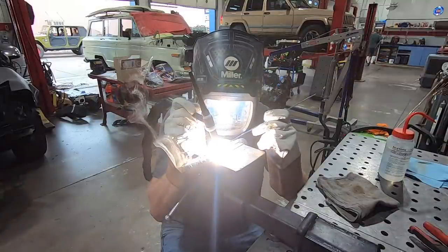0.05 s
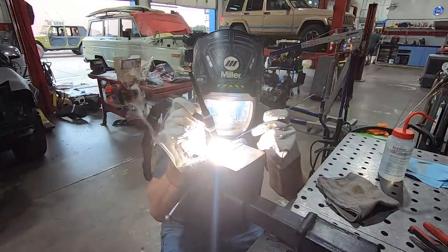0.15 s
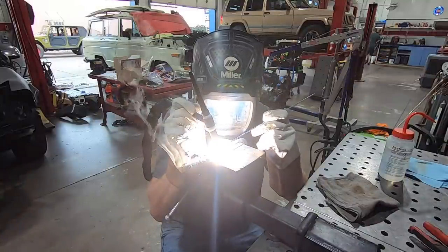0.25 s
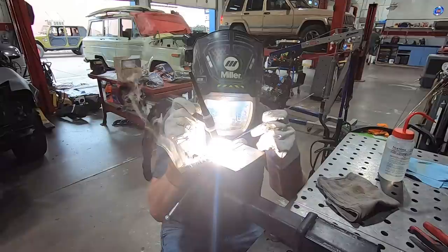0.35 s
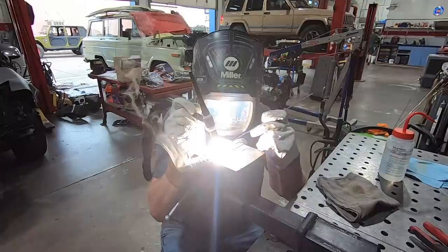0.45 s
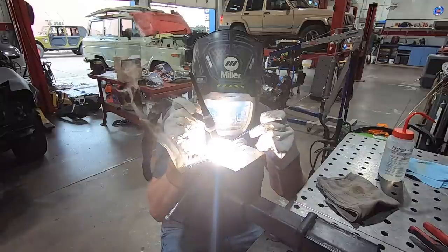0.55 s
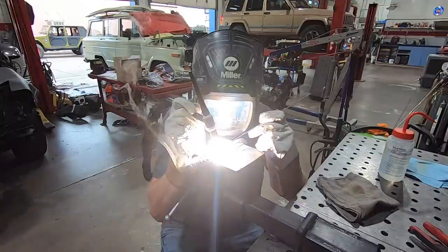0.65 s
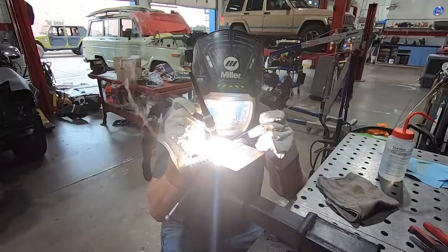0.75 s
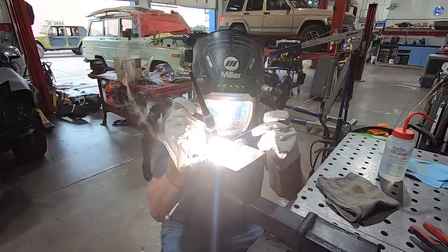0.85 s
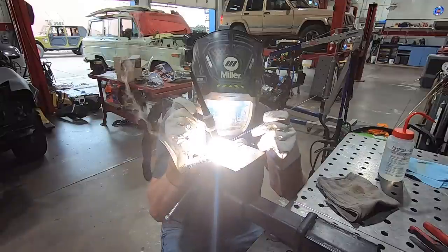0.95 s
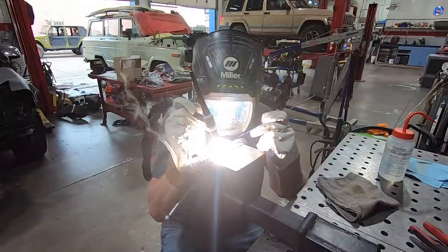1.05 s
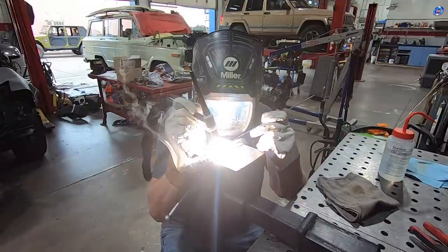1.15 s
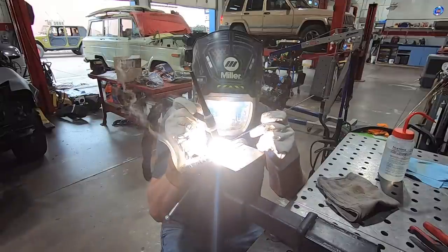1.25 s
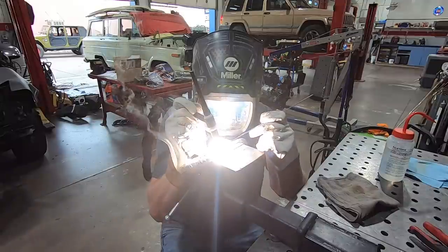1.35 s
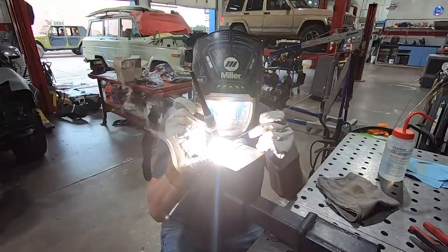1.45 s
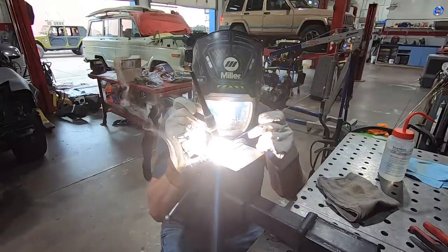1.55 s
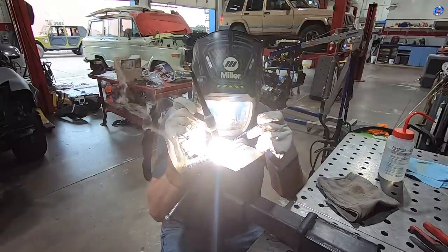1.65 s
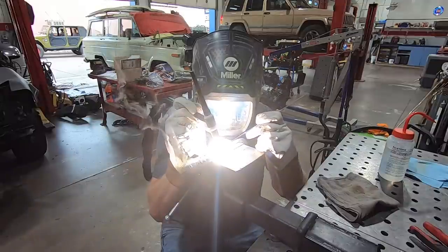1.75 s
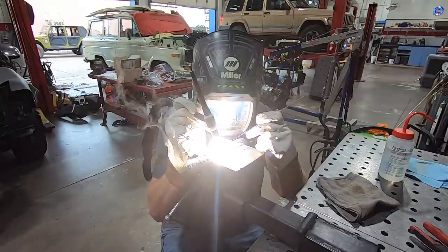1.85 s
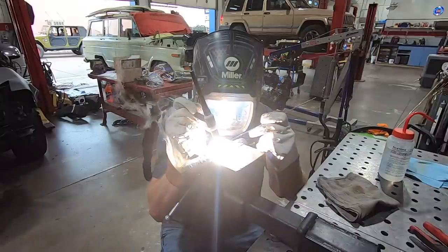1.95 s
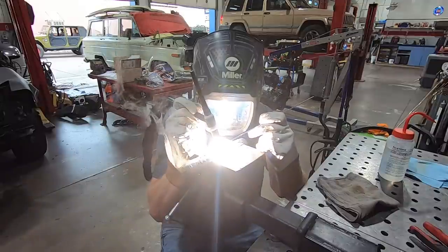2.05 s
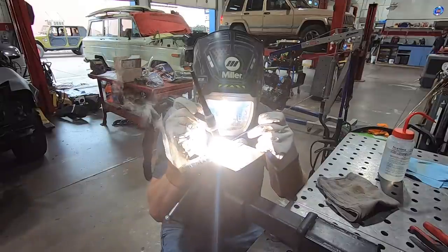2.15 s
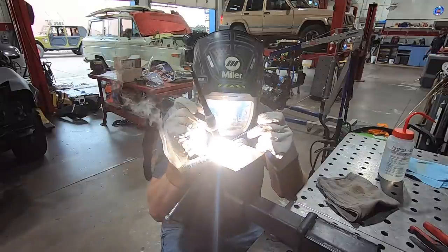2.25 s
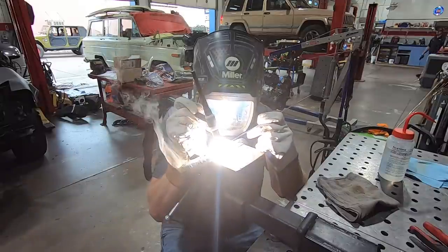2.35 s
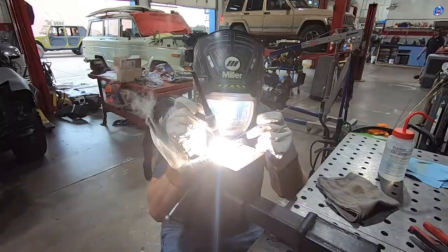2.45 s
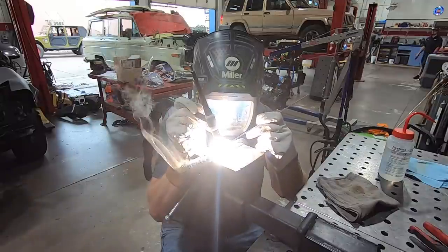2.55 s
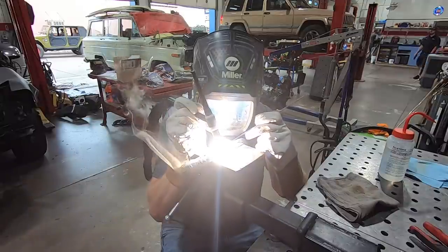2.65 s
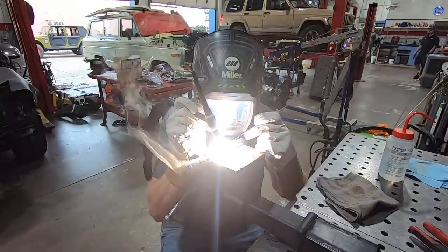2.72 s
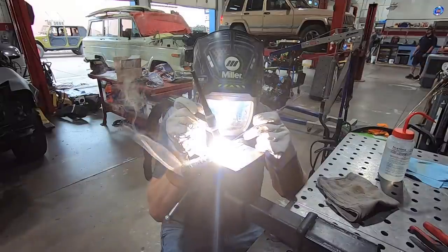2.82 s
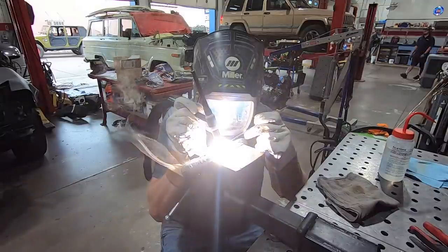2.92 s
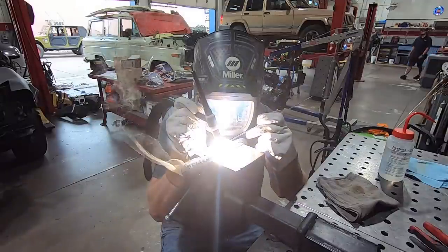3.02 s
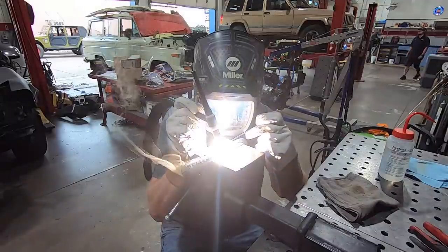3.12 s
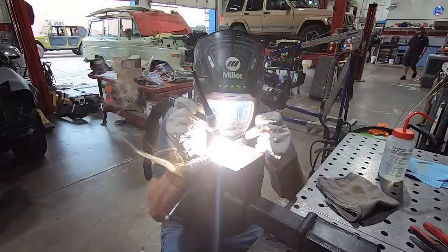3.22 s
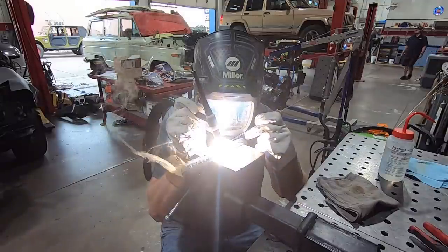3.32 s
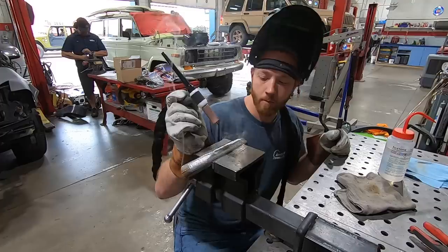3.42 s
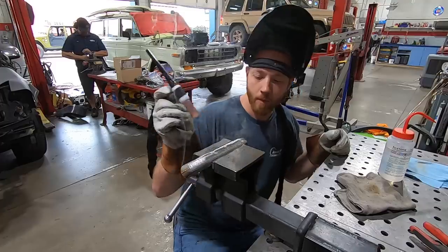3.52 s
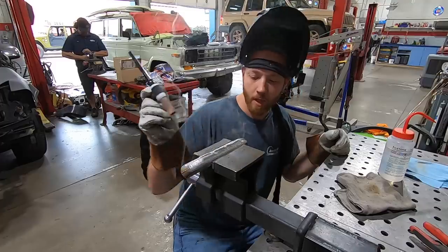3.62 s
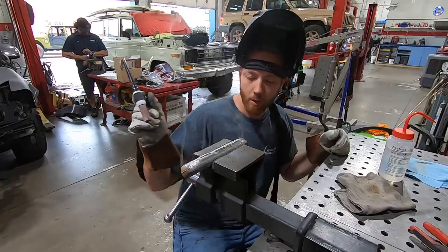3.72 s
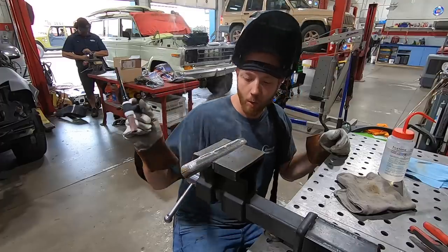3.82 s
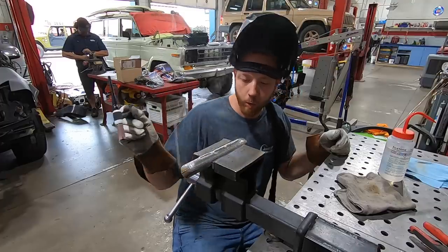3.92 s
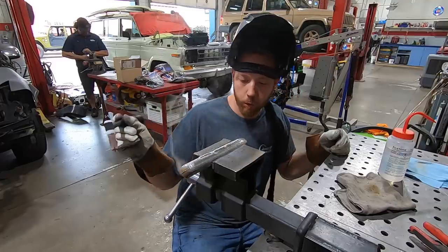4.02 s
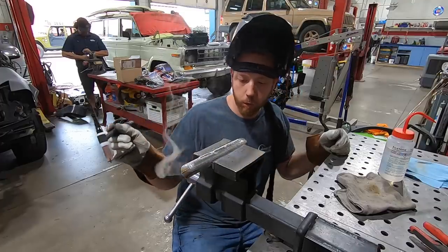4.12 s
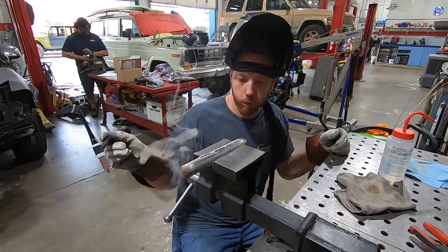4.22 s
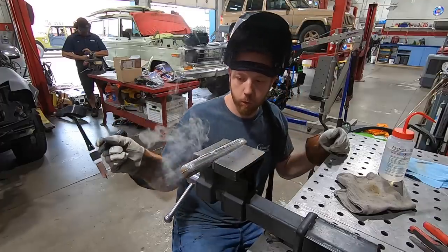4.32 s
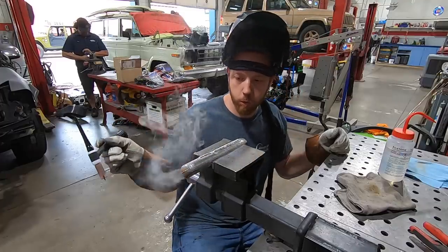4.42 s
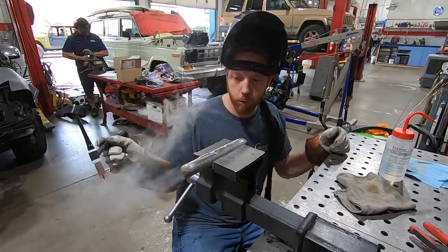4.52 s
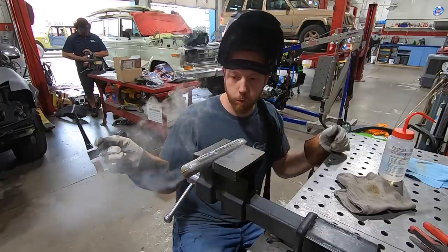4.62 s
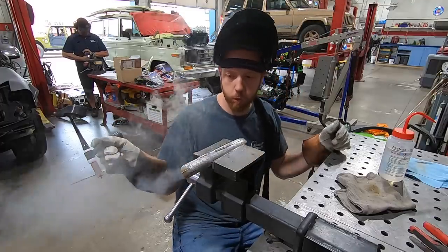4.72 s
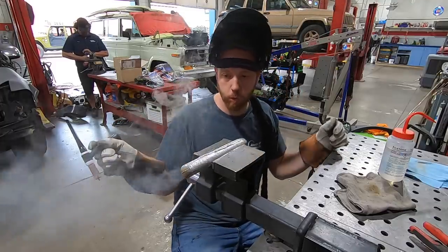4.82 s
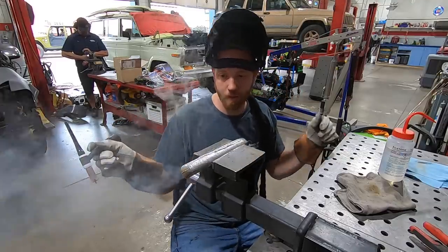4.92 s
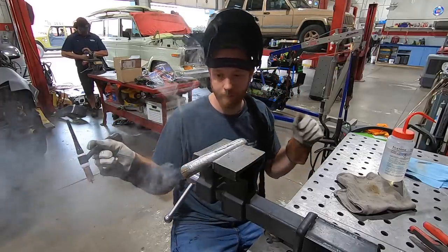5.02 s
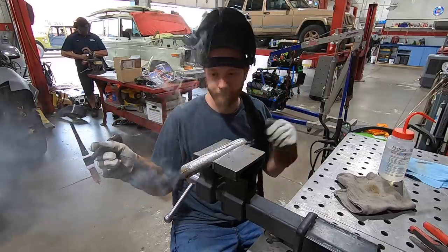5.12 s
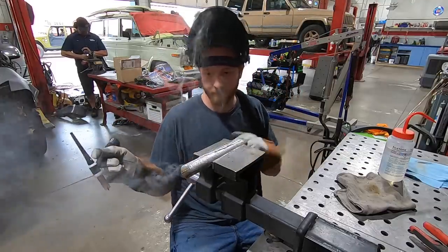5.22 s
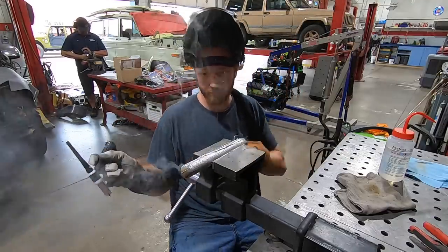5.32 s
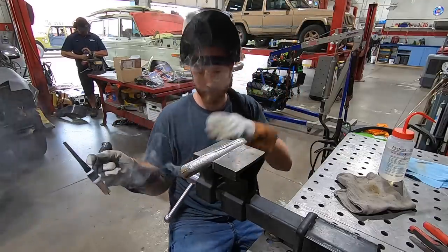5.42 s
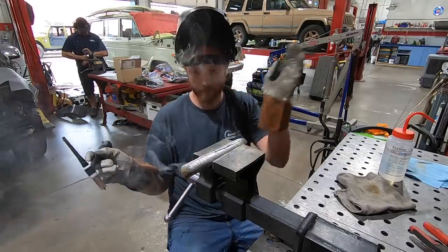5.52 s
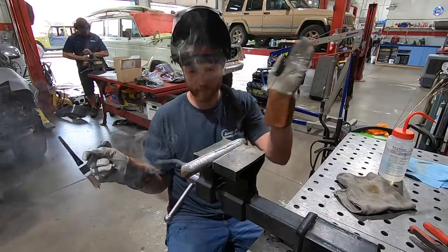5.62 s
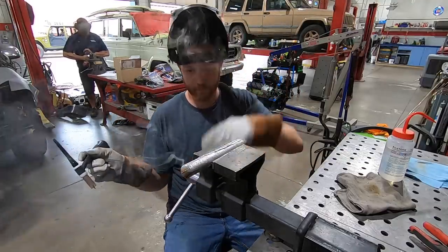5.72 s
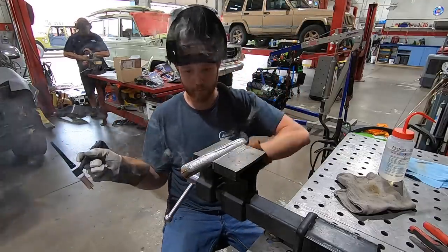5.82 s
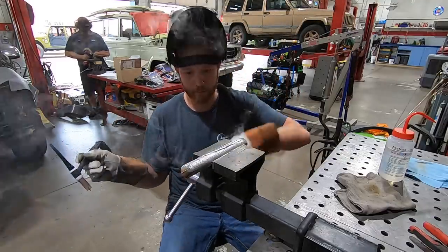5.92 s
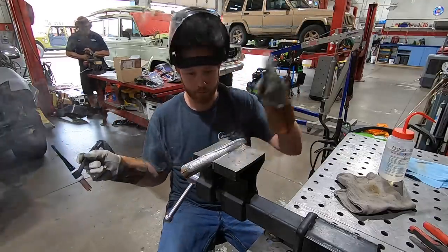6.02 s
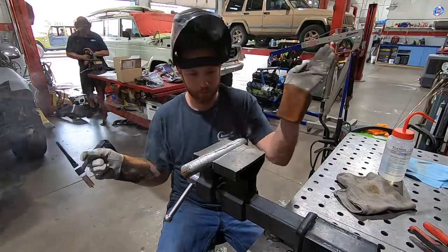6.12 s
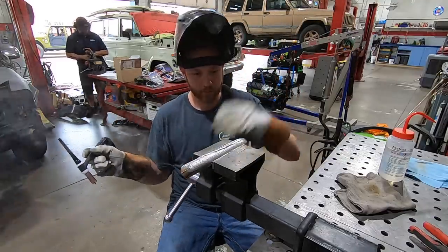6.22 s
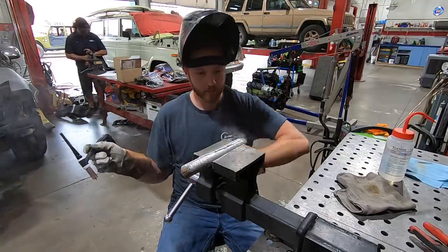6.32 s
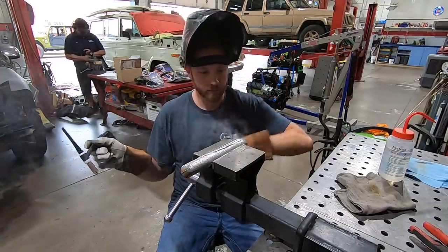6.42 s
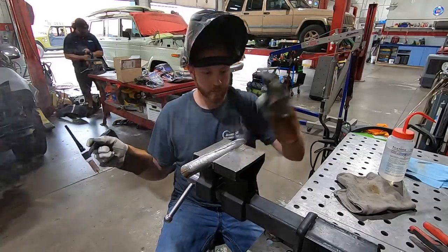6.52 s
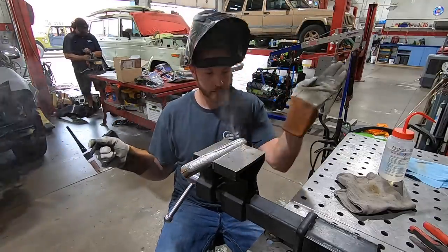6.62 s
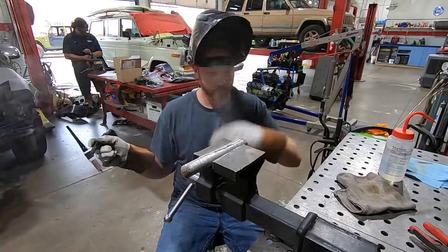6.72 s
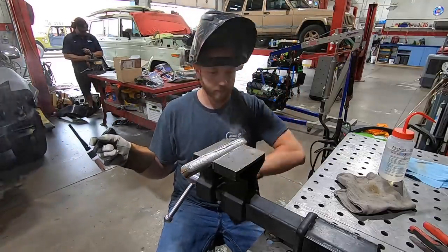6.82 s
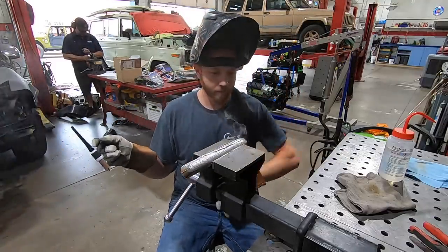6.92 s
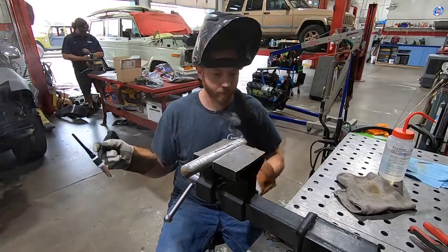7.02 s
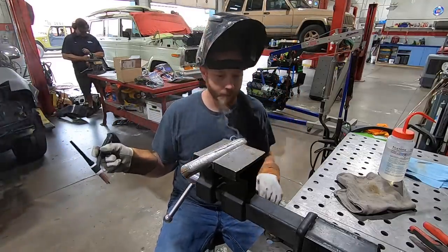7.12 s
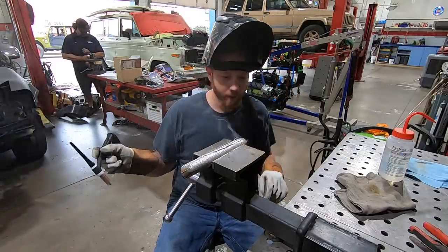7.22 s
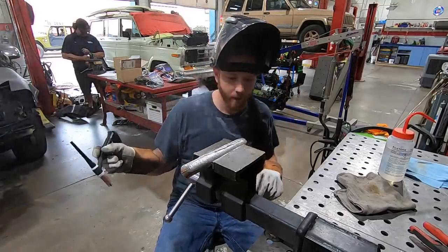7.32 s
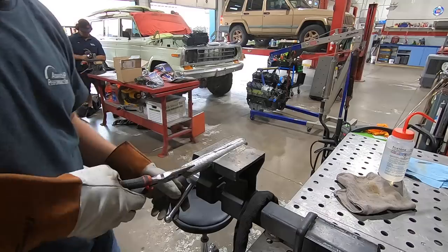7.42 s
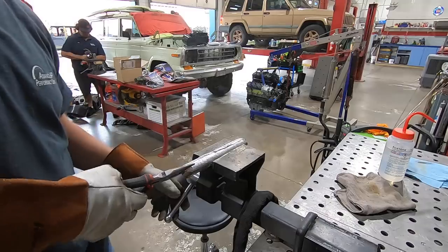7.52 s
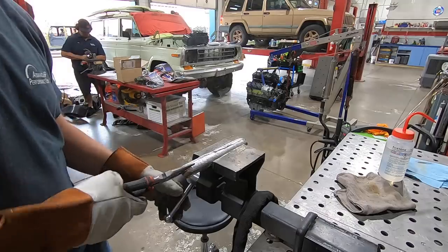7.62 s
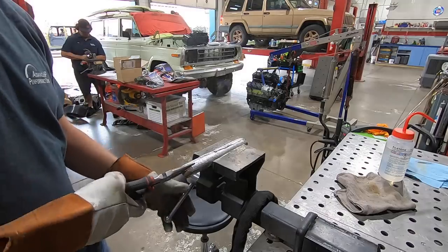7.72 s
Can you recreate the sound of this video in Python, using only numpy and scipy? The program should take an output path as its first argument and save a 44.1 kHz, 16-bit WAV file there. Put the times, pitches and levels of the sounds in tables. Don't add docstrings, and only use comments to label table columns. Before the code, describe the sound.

Raspy mains-rate arc buzz on aluminum cuts off abruptly; a far pneumatic grinder whirs, fades and restarts, and a tool scrubs a metal tube.

```python
import sys
import numpy as np
from scipy import signal
from scipy.fft import rfft, irfft, next_fast_len
from scipy.io import wavfile
from scipy.ndimage import uniform_filter1d

SR = 44100
rng = np.random.default_rng(int(sys.argv[2]) if len(sys.argv) > 2 else 0)


def makeup_ratio(level_db):
    decades = np.asarray(level_db, float) / 20
    return 10 ** decades


def output_pcm(signal):
    pcm = np.clip(np.atleast_2d(signal).T, -1, 1) * 32767
    wavfile.write(sys.argv[1], SR, np.round(pcm).astype(np.int16))


N = 342202
T = np.arange(N) / SR

ARC_HZ, FIRST_S, ARC_END_S = 60.015, .0075, 3.4115
CLEAN_S = .00668
VALVE_OPEN_S = 7.103

# start_s, level_db
SCRUB = [
    (7.45, -28.5),
    (7.76, -27),
]
# pitch_hz, level_db
SIZZLE = [(300, -2.5), (1400, -8), (2650, 0), (4000, -3), (8000, 3), (10500, 10.5), (16000, -1.5)]


def level(x, db):
    return x * makeup_ratio(db) / np.sqrt(np.mean(x ** 2))


def curve(table, column):
    return np.interp(T, [row[0] for row in table], [row[column] for row in table])


def shape(spectrum, hz):
    return np.interp(np.log(hz + 1), np.log([row[0] for row in spectrum]), [row[1] for row in spectrum])


def ring(x, hz, width):
    return signal.lfilter(*signal.iirpeak(hz, hz / width, fs=SR), x)


def colour(spectrum):
    size = next_fast_len(N)
    hz = np.arange(size // 2 + 1) * SR / size
    noise = rfft(rng.standard_normal(size)) * makeup_ratio(shape(spectrum, hz))
    return level(irfft(noise, size)[:N], 0)


def walk(rate):
    knots = uniform_filter1d(rng.standard_normal(int(2 * rate * N / SR) + 3), size=2)
    return np.interp(T * 2 * rate, np.arange(len(knots)), knots) / np.std(knots)


def clicks(times, sizes):
    out, taps = np.zeros(N + 32), np.arange(-8, 9)
    at = np.asarray(times)[:, None] * SR
    index = np.round(at).astype(int) + taps
    pulses = np.sinc(index - at) * np.hanning(19)[1:-1] * np.asarray(sizes)[:, None]
    np.add.at(out, index + 8, pulses)
    return out[8:N + 8]


def late_lows(x, hz):
    a = np.tan(np.pi * hz / SR - np.pi / 4)
    return signal.lfilter([-a, -1], [1, a], x)


def hall(x, t60):
    tail = rng.standard_normal(SR // 2) * np.exp(-np.log(1000) * T[:SR // 2] / t60)
    return signal.oaconvolve(x, tail / np.linalg.norm(tail))[:N]


def since(s, tau):
    return 1 - np.exp(-np.clip(T - s, 0, None) / tau)


def small_ticks():
    # start_s, peak_db, ring_hz
    tick_table = [
        (6.4288, -38, 5200),
        (6.4342, -31, 5300),
        (6.4442, -31, 5200),
        (6.4924, -31, 5130),
    ]
    ticks = 0
    for s, db, hz in tick_table:
        rung = ring(ring(clicks([s], [makeup_ratio(db + 20.5)]), hz, 750), hz, 2500)
        ticks = ticks + rung - ring(clicks([s], [makeup_ratio(db + 2)]), 8200, 3500)
    return ticks + makeup_ratio(-2) * hall(ticks, 0.31) + makeup_ratio(-7) * hall(ticks, .025)


def shop():
    # pitch_hz, level_db (per Hz)
    rumble_spectrum = [(15, -44), (30, -11), (100, -3.5), (137, -3.5), (165, -6), (300, -8), (420, -8),
                       (560, -2.5), (770, -8.5), (950, -9), (2000, -17.5), (3300, -18.5), (4200, -27.5),
                       (15900, -47)]
    # pitch_hz, rms_db
    fan = [(120, -58), (129, -63.5), (577, -59)]
    # time_s, pitch_hz, peak_db
    thud_table = [
        (7.02, 45, -43),
        (7.39, 62, -40.5),
    ]
    rumble = colour(rumble_spectrum) * makeup_ratio(-43.5 - 0.5 + walk(6))
    lines = sum(makeup_ratio(db + 3.0 + 2.1 * walk(3.4)) * np.sin(2 * np.pi * hz * T) for hz, db in fan)
    thuds = 0
    for s, hz, db in thud_table:
        thuds = thuds + makeup_ratio(db) * np.exp(-((T - s) / 0.025) ** 2) * np.sin(2 * np.pi * hz * T)
    return rumble + lines + thuds + small_ticks()


def valve():
    # start_s, speed_change_hz
    presses = [
        (4.87, -10),
        (5.169, 3.5),
        (5.4, -3.5),
    ]
    # time_s, level_db
    aim_table = [
        (3.42, -9.5),
        (4.2, -9),
        (4.37, -2.5),
        (4.54, -1.5),
        (4.63, -4.5),
        (4.72, -2),
        (5.3, 0.5),
        (5.85, 0.5),
        (7.45, 0),
    ]
    shut_at_s = 5.915
    free_hz, restart_hz = 394.2, 377.5
    coast_s, spin_up_s, settle_s, fill_s = .33, .042, .05, 0.086
    leak_db = -22

    again = T > VALVE_OPEN_S
    running = free_hz + sum(step * since(s, settle_s) for s, step in presses)
    coasting = running * (1 - since(shut_at_s, coast_s))
    speed = np.where(again, restart_hz * since(VALVE_OPEN_S, spin_up_s), coasting)
    state = since(presses[0][0], 0.078) + again

    shut_s = np.clip(T - shut_at_s, 0, None) * ~again
    aim = curve(aim_table, 1)
    pressure = makeup_ratio(leak_db) + np.where(again, since(VALVE_OPEN_S, fill_s), makeup_ratio(-81 * shut_s))
    pressure_db = 20 * np.log10(pressure)
    rush = -42 + 0.22 * aim + pressure_db
    treble = -9 + 0.21 * aim - np.minimum(60 * shut_s, 12)
    whistle = -44.5 + aim + pressure_db - 110 * shut_s
    return speed, state, rush, treble, whistle


def grinder():
    # free_db, loaded_db, restarting_db
    shaft_tones = [(0.99, 11.9, -17, -14.5, -19), (1.947, 4, -14, -16.5, -21), (3, 40, -14.5, -15, -11),
                   (3.81, 60, -12.5, -11, -23), (5.04, 60, -13.5, -9, -18), (5.95, 65, -5.5, -11.5, -13),
                   (8.86, 75, -10.5, -13, -15), (11.06, 50, -24, -20, -9), (14.97, 69.4, -17.5, -17, -30),
                   (14.8, 60, -27, -30, -12), (17.1, 80, -21, -15.5, -22), (18, 110, -34, -30, -10),
                   (26.1, 150, -38, -22, -33), (30, 220, -27, -28, -32), (35, 200, -29, -32, -32)]
    # pitch_hz, level_db (per Hz)
    rush_spectrum = [(410, -41), (700, -5), (1150, 0), (1820, -6.5), (2360, -3), (2760, -8), (3410, -7.5),
                     (3680, -8), (4790, -5.5), (9950, -18.5), (10900, -25.5), (14400, -26), (15900, -29)]
    vanes = 12
    speed, state, rush_db, treble_db, whistle_db = valve()
    turn = np.cumsum(speed) / SR

    def tone(multiple, wander_hz, flutter_db):
        cycles = multiple * turn + np.cumsum(wander_hz * walk(120)) / SR
        return makeup_ratio(flutter_db * walk(45)) * np.sin(2 * np.pi * cycles)

    whine = 0
    for multiple, wander_hz, *db in shaft_tones:
        whine = whine + makeup_ratio(np.interp(state, np.arange(3), db)) * tone(multiple, wander_hz, 2.05)
    whine = whine * makeup_ratio(rush_db + 3.5)

    gathering = (T > VALVE_OPEN_S) * (1 - since(VALVE_OPEN_S, 0.052))
    whistle = tone(vanes, 9, 1.9) + makeup_ratio(5) * gathering * tone(2 * vanes, 31, 2.5)
    whistle = whistle * makeup_ratio(whistle_db + 0.5)

    rush = colour(rush_spectrum) * makeup_ratio(0.41 * walk(10))
    top = signal.sosfilt(signal.butter(2, 6500, "high", fs=SR, output="sos"), rush)
    rush = (rush - top + top * makeup_ratio(treble_db + 11.5)) * makeup_ratio(rush_db + 2.0)

    whine = whine + makeup_ratio(-2.5) * hall(whine, 0.25) + whistle + makeup_ratio(-16) * hall(whistle, 0.34)
    return (rush + whine) * (T > ARC_END_S) * (T < SCRUB[0][0])


def scrub():
    # pitch_hz, width_hz, level_db
    tube_modes = [(880, 340, -7), (1950, 78, 1), (2620, 33, -2.5), (3300, 40, -14), (3580, 41, -4),
                  (3830, 74, 0.5), (4240, 22, 3), (4780, 150, -0.5), (5620, 44, 3.5), (6030, 88, 1),
                  (7000, 100, -6.5), (8020, 60, -11), (11800, 120, -24), (13630, 2500, -29)]
    # pitch_hz, level_db (per Hz)
    air_spectrum = [(180, -45), (300, -14), (855, -8.5), (1270, -7), (1960, -4), (2480, -7), (4820, -8.5),
                    (5230, -11), (5780, -8.5), (15900, -36.5)]
    cut_s = 7.4485
    grit = rng.standard_normal(N) * makeup_ratio(1.8 * walk(700) + 1.8 * walk(60))
    tube = 0
    for k, (hz, width, db) in enumerate(tube_modes):
        mode = ring(ring(grit, hz, width), hz, 3 * width)
        tube = tube + (-1) ** k * makeup_ratio(db + walk(40)) * mode
    air = colour(air_spectrum) * makeup_ratio(2 * walk(500))
    onset = 1 + 0.53 * np.exp(-np.abs(T - cut_s) / 0.0033)
    return (level(tube, -4.0) + level(air, -5.0)) * makeup_ratio(curve(SCRUB, 1)) * onset * (T > cut_s)


def body(x, source):
    # pitch_hz, level_db
    work_piece = [(40, -18), (150, -1.5), (550, 6.5), (1400, 14.5), (2100, 12.5), (2650, 1), (3400, 8),
                  (4100, 3), (4600, 10.5), (5200, 3.5), (6300, 6.5), (7200, 3), (8000, 5.5)]
    # pitch_hz, level_db
    shadow = [(7400, 0), (8050, 2.5), (8600, -5.5), (9150, -3), (9900, -17.5), (11300, -15), (12200, -4.5),
              (13300, -1.5), (14000, -1), (14500, -1.5), (15200, -3), (16500, -3)]
    shadow_drift = (1, 1.018)
    # pitch_hz, width_hz, level_db
    plate = [(241.6, 21, 7), (443, 39, 4), (589, 68, 7), (800, 180, 3), (923, 116, -10), (1140, 148, 5.5),
             (1511, 20, 4.5), (1570, 210, -4), (1950, 120, 0)]
    # start_hz, end_hz, width_hz, start_db, end_db
    null_table = [(5000, 5750, 240, -7, 3.5), (8070, 9070, 410, -4, -5.5), (12950, 13750, 400, -6, -11),
                  (14200, 15000, 370, 0, -3), (15400, 16000, 500, -8, 0), (9650, 9800, 280, -6, -1)]
    size, stages = 2 ** 12, np.linspace(0, 1, 7)
    hz = np.arange(size // 2 + 1) * SR / size

    def bump(centre, width, gain_db):
        return gain_db / (1 + (2 * (hz - centre) / width) ** 2)

    fixed_db = shape(source, hz) + shape(work_piece, hz) + sum(bump(*mode) for mode in plate)
    out, step = np.zeros(N + size), int(ARC_END_S * SR * stages[1])
    for k, done in enumerate(stages):
        nulls = sum(bump(f + done * (f_end - f), width, g + done * (g_end - g))
                    for f, f_end, width, g, g_end in null_table)
        shadow_db = shape(shadow, hz / np.interp(done, [0, 1], shadow_drift))
        cepstrum = irfft((fixed_db + nulls + shadow_db) * np.log(10) / 20)[:size // 2]
        cepstrum[1:] *= 2
        response = irfft(np.exp(rfft(cepstrum, size)))[:size // 2]
        span = np.arange(max(k - 1, 0) * step, min(k + 1, len(stages) - 1) * step)
        heard = signal.oaconvolve(x[span] * (1 - np.abs(span / step - k)), response)
        out[span[0]:span[0] + len(heard)] += heard
    return out[:N]


def torch():
    # time_s, half_length_s, crack_gain_db, sizzle_gain_db
    flares = [
        (1.053, .12, 3.3, .1),
        (1.78, 0.16, -0.5, 3),
        (2.0, .12, 1.5, 0),
        (2.75, 0.093, -2.3, 1.5),
        (2.978, 0.12, -0.3, 1.5),
        (3.07, .07, 3, -0.5),
    ]
    crack, sizzle = 0, 0
    for s, half, crack_gain, sizzle_gain in flares:
        lift = np.exp(-((T - s) / half) ** 2)
        crack = crack + crack_gain * lift
        sizzle = sizzle + sizzle_gain * lift
    cold = 2 * np.exp(-T / 1)
    thump = -22.5 - 0.03 * T + 0.5 * cold - 0.63 * sizzle
    return thump, -1.5 + crack - cold, -.3 + sizzle - cold


def reversals(crack_db):
    # time_s, extra_path_ms
    creep = [
        (0, 0.0086),
        (1.7, -0.12),
        (3.4, 0.029),
    ]
    # time_s, level_db
    odd_strikes = [(.041, -5), (.207, 1), (1.157, -5), (1.674, 4), (1.707, 5), (1.724, 4), (1.807, 5),
                   (1.84, 6.5), (1.874, -5), (2.39, -5), (3.04, 2.5), (3.29, -7), (3.356, -3)]
    # pitch_hz, level_db
    strike_colour = [(900, -1.5), (1500, 1), (1900, -4), (2250, -15), (2700, -2), (3400, -6), (4600, -5),
                     (6300, 5), (8000, 7.5), (9200, 6.5), (12000, 4.5), (16000, 1.5)]
    return_colour = [(700, 0.5), (1500, .5), (4600, 1), (6300, 0), (8000, -3.5), (9200, -1), (12000, 1.5),
                     (16000, -1)]
    clock_hz, scatter_db = 7518., 1.7
    start = FIRST_S + np.arange(int((ARC_END_S - FIRST_S) * ARC_HZ) + 1) / ARC_HZ
    luck = np.clip(rng.standard_normal((len(start), 4)).T, -2, 2)
    odd_s, odd_db = np.transpose(odd_strikes)
    luck[2, np.round((odd_s - FIRST_S) * ARC_HZ).astype(int)] = odd_db / scatter_db
    low = signal.butter(1, 2500, fs=SR)
    # delay_s, colour, level_db, scatter_db, plasma gain, phase_turn_hz
    edges = [(0, strike_colour, -.5, scatter_db, .07, 1100),
             (CLEAN_S, return_colour, 0, .6, .06, 2400)]
    cracks = 0
    for edge, (late, source, db, bright_db, fizz, turn_hz) in enumerate(edges):
        s = np.round((start + late) * clock_hz) / clock_hz
        s = s + np.interp(start, *np.transpose(creep)) / 1000
        s = s[s < ARC_END_S]
        push = clicks(s, makeup_ratio(db + 0.42 * luck[edge, :len(s)]))
        snap = clicks(s, makeup_ratio(db + bright_db * luck[2 + edge, :len(s)])) * makeup_ratio(crack_db - 1.5)
        burst = signal.lfilter([1], [1, -np.exp(-1 / (0.00038 * SR))], snap)
        snap = snap + fizz * burst * rng.standard_normal(N)
        pulse = snap + signal.lfilter(*low, push - snap)
        cracks = cracks + late_lows(body(pulse, source), turn_hz)
    return cracks


def pool_sizzle(sizzle_db):
    cleaning = uniform_filter1d(1. * ((T - FIRST_S) % (1 / ARC_HZ) < CLEAN_S), size=30)
    sizzle = rng.standard_normal(N) * makeup_ratio(8.0 * cleaning + 1.4 * walk(40.26) + 2 * walk(900) + sizzle_db)
    return body(sizzle, SIZZLE)


def spatter():
    # time_s, peak_db
    bursts = [
        (1.4737, -13),
        (1.4757, 0),
        (1.4777, -13),
        (1.4837, -15),
        (1.4865, -13),
        (1.4907, -4),
    ]
    s, peak_db = np.transpose(bursts)
    return body(clicks(s, makeup_ratio(peak_db + 1)), SIZZLE)


def arc():
    # delay_ms, level_db
    echoes = [(1.3, -22.5), (2.1, -22), (2.9, -31), (4.1, -19.5), (6.3, -24.5), (8.4, -30)]
    thump_db, crack_db, sizzle_db = torch()
    burning = level(reversals(crack_db), -1.48) + level(pool_sizzle(sizzle_db), -12.0)
    direct = burning * makeup_ratio(thump_db) + spatter()
    reflections = clicks([delay / 1000 for delay, _ in echoes], [makeup_ratio(db) for _, db in echoes])[:512]
    wet = direct + signal.oaconvolve(direct, reflections)[:N]
    return wet * np.clip((ARC_END_S - T) / 0.00031, 0, 1)


def scene():
    # start_s, end_s
    apart_times = [(0, .35), (.81, .87), (1.22, 1.31), (1.37, 1.78), (2.09, 2.26), (2.6, 2.68),
                   (3.03, 3.14), (3.24, 3.43), (4.35, 4.53), (5.8, 7.1)]
    # pitch_hz, level_db (re both together), chance level to pass
    apart_bands = [(60, -15, 1), (130, -20, 0.89), (280, -15, 1.03), (550, -22, 1.45), (2800, -14, 2.6),
                   (5270, -15.5, 1.7), (8000, -10.5, 1.6), (12300, -10.5, 1.62)]
    mid = shop() + grinder() + scrub() + arc()
    apart = sum(1. * (T > a) * (T < b) for a, b in apart_times)
    blur = mid * walk(150)
    side = 0
    for hz, db, rare in apart_bands:
        on = uniform_filter1d(1. * (2.2 * apart + walk(15) > rare), size=400)
        side = side + makeup_ratio(db) * on * ring(ring(blur, hz, 0.45 * hz), hz, 0.45 * hz)
    return np.array([mid + side, mid - side])


def roll_off(x):
    return signal.sosfilt(signal.butter(12, 16090, fs=SR, output="sos"), x)


def record(dry):
    limited = np.clip(dry, -.7, .8)
    cut = signal.sosfilt(signal.ellip(10, .2, 80, 15820, fs=SR, output="sos"), limited)
    return roll_off(cut)


dry = scene()
out = record(dry)
output_pcm(out)
```